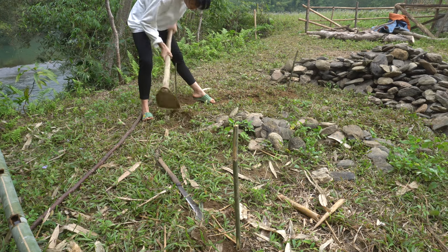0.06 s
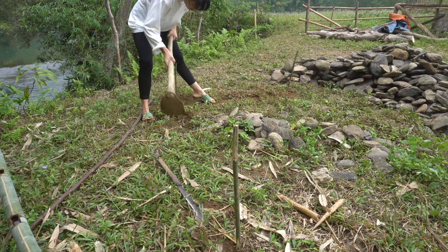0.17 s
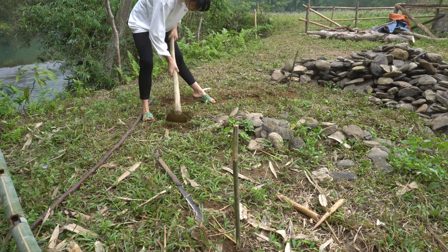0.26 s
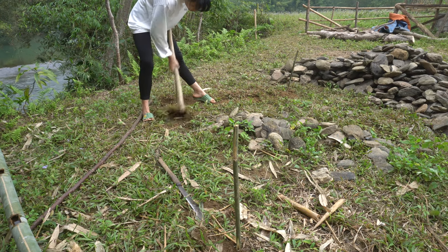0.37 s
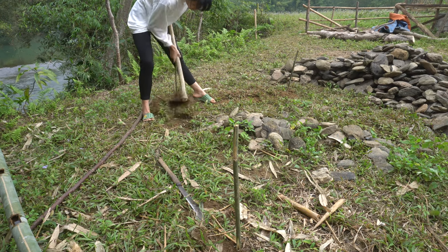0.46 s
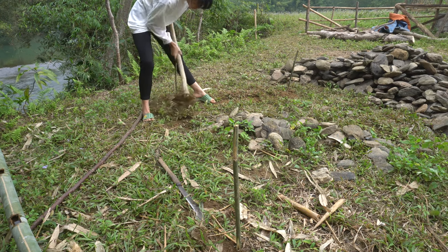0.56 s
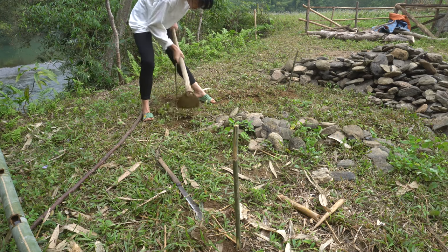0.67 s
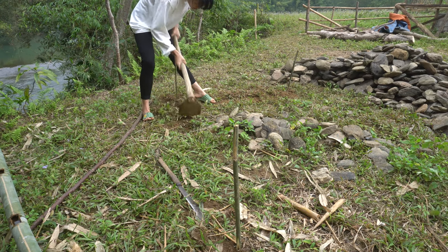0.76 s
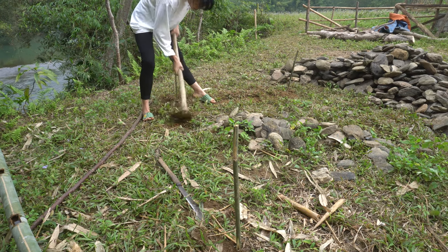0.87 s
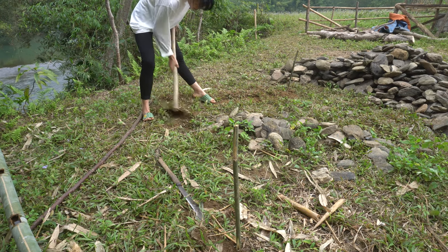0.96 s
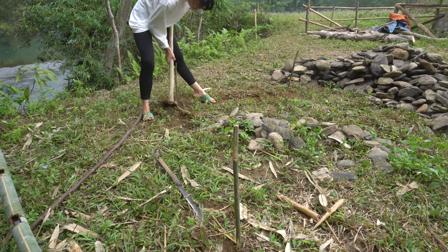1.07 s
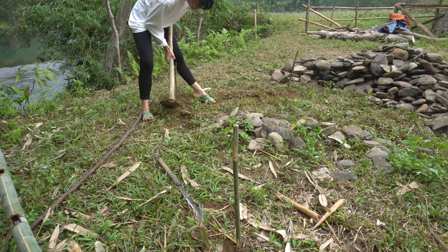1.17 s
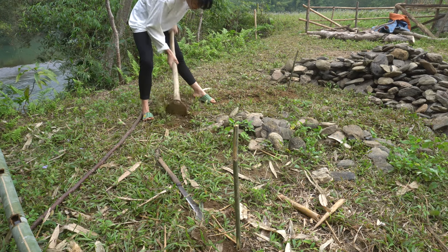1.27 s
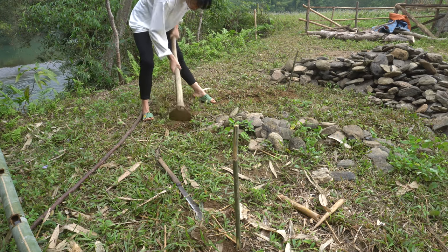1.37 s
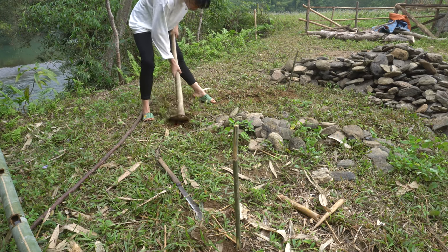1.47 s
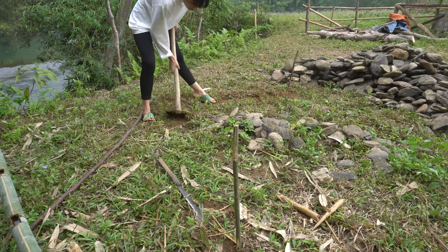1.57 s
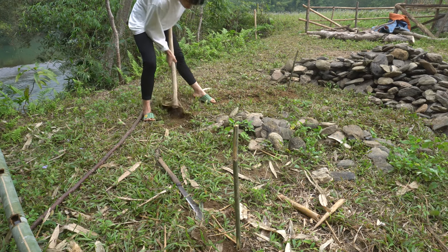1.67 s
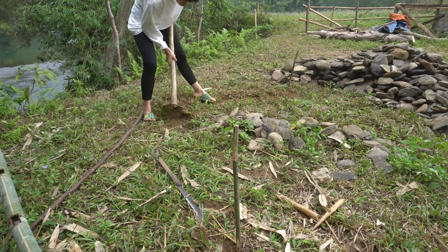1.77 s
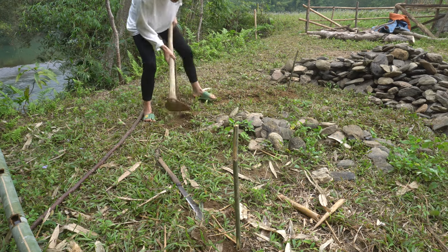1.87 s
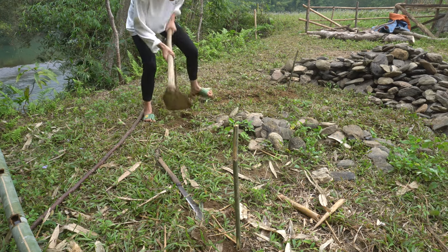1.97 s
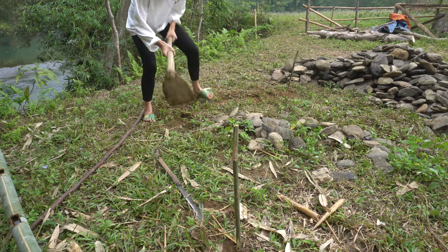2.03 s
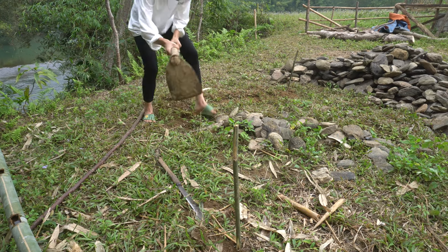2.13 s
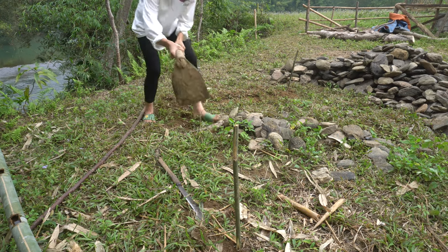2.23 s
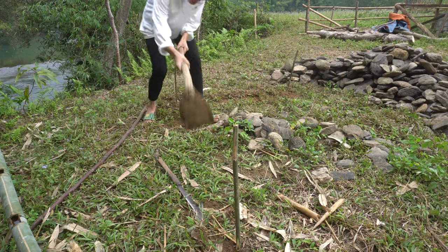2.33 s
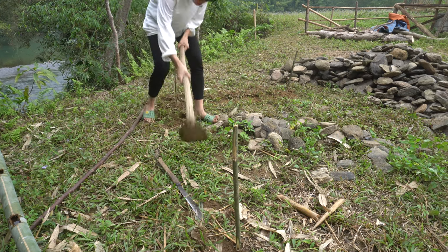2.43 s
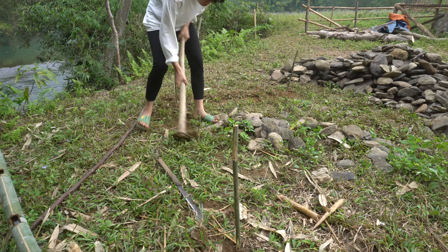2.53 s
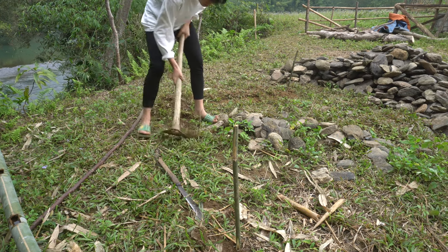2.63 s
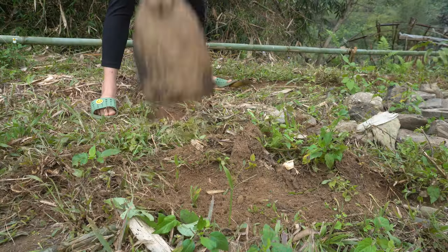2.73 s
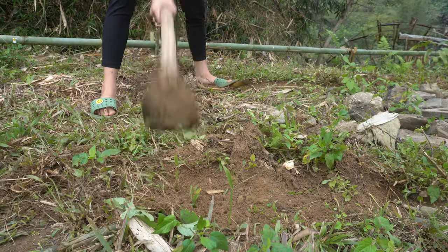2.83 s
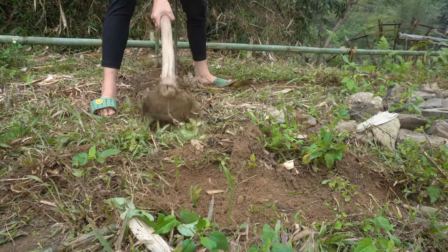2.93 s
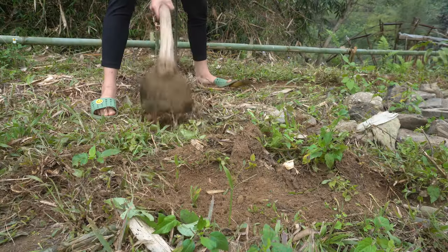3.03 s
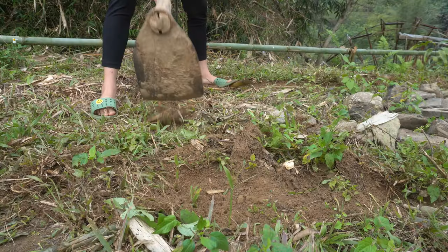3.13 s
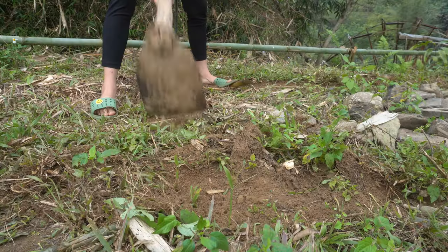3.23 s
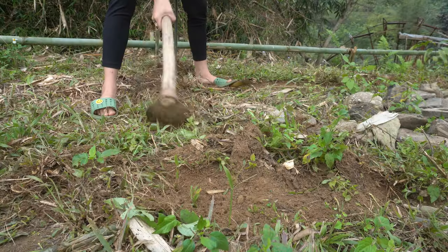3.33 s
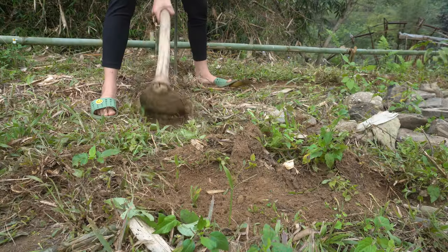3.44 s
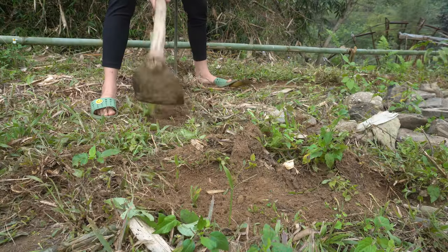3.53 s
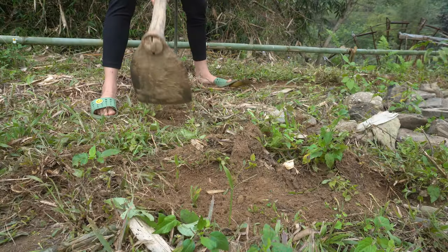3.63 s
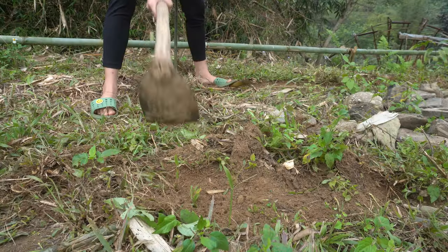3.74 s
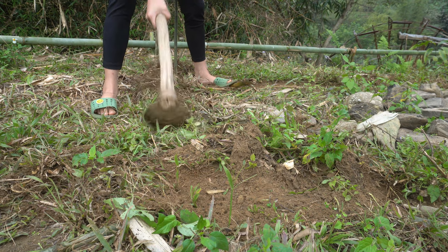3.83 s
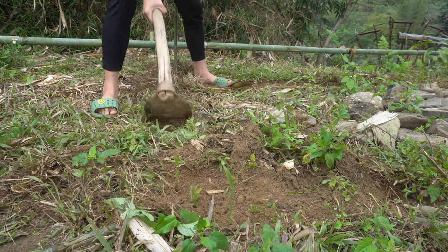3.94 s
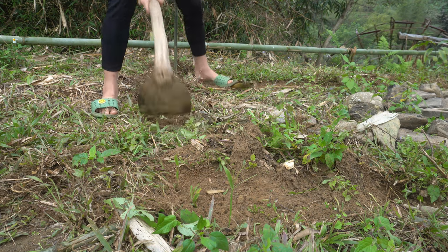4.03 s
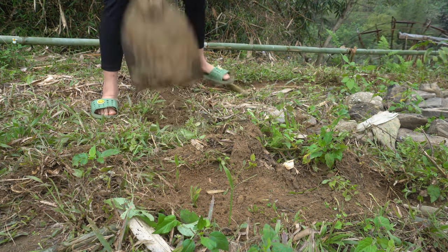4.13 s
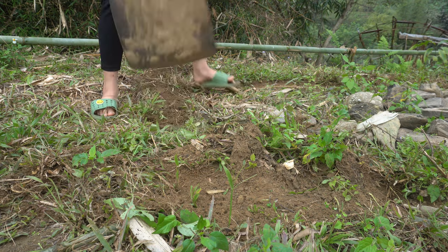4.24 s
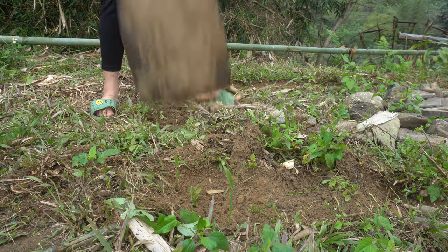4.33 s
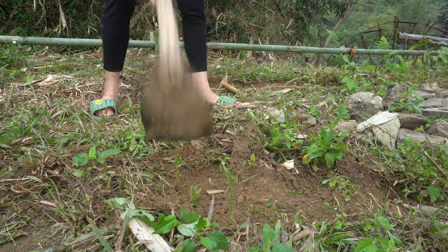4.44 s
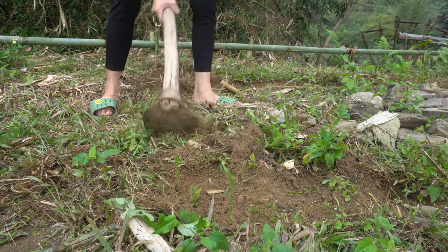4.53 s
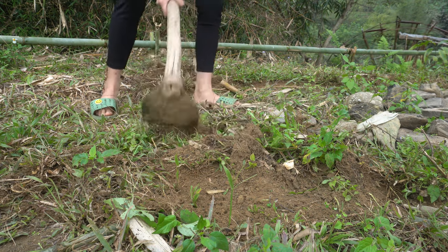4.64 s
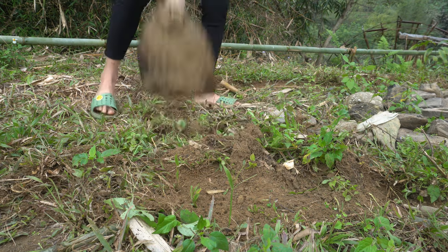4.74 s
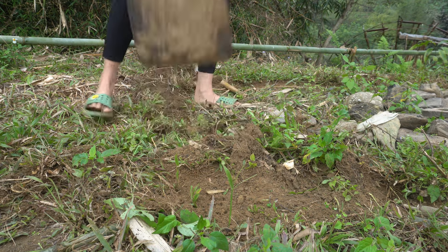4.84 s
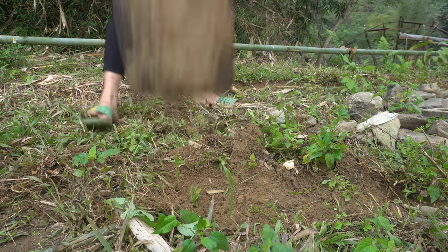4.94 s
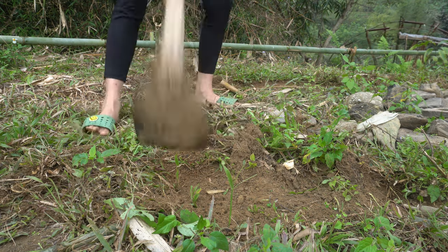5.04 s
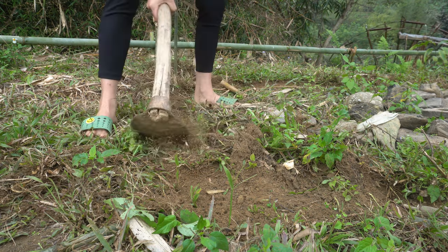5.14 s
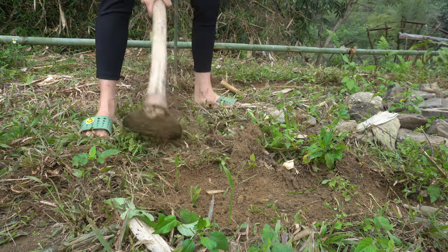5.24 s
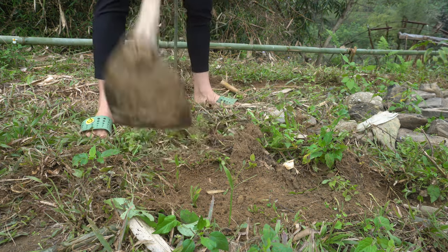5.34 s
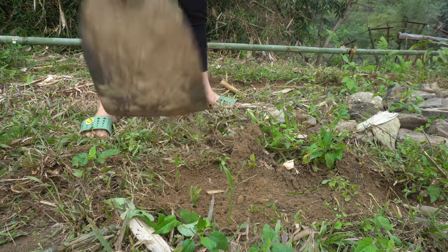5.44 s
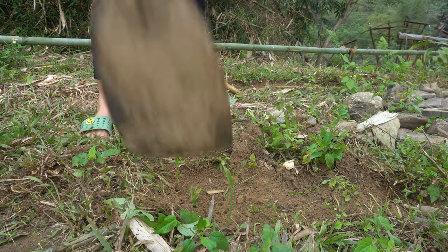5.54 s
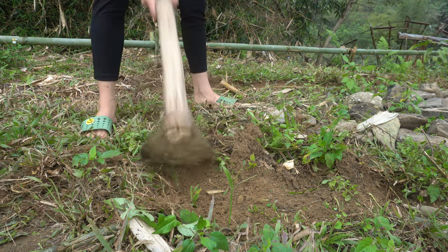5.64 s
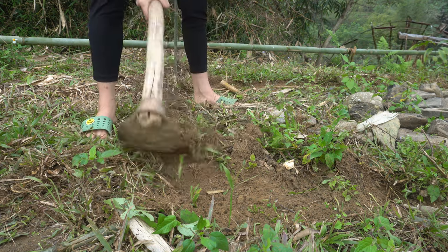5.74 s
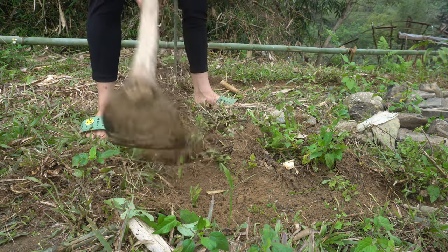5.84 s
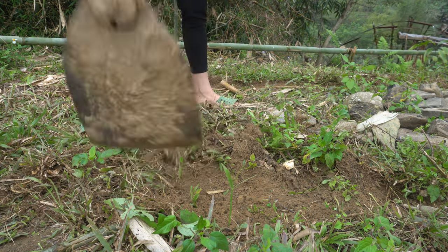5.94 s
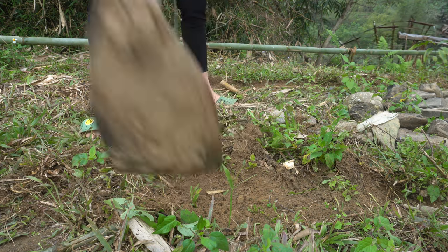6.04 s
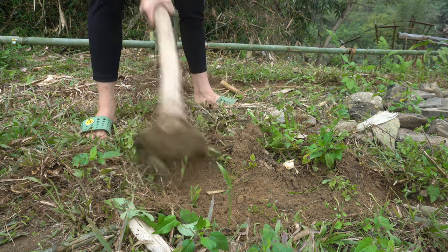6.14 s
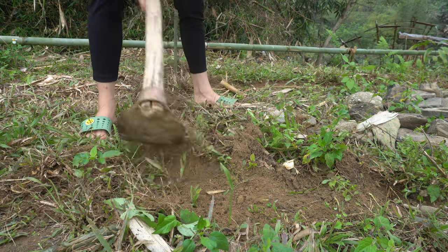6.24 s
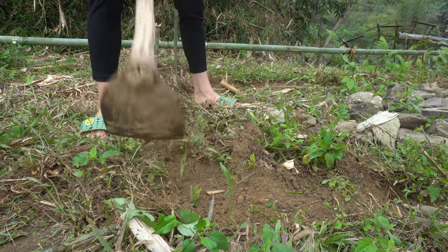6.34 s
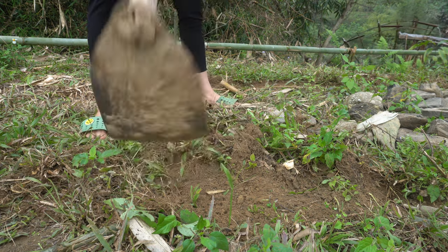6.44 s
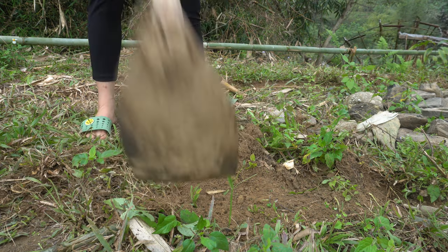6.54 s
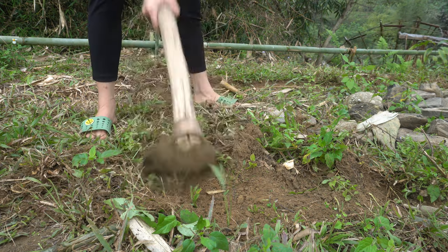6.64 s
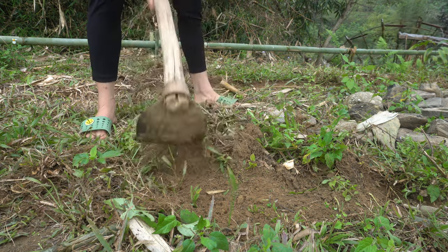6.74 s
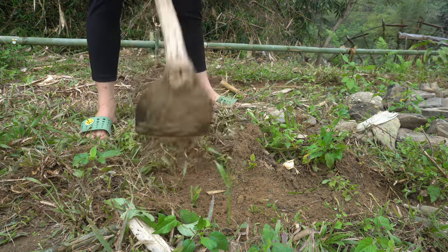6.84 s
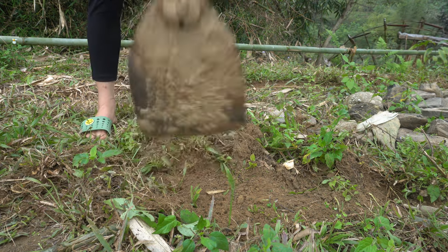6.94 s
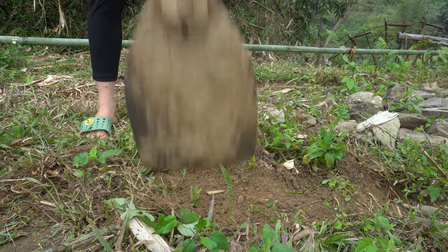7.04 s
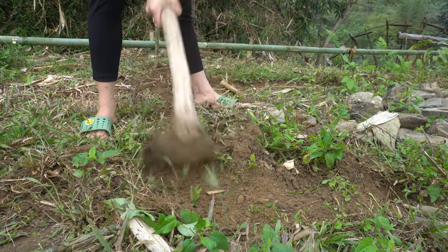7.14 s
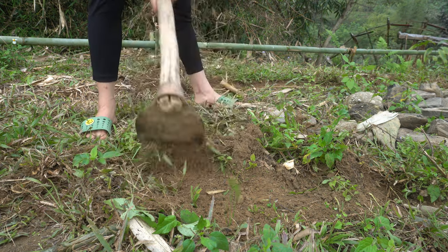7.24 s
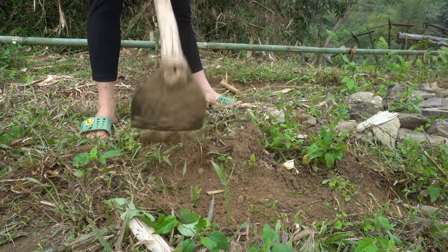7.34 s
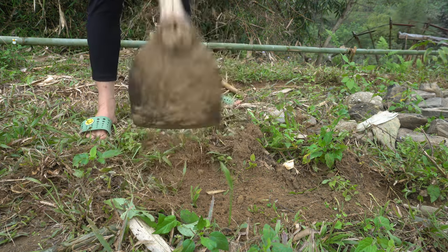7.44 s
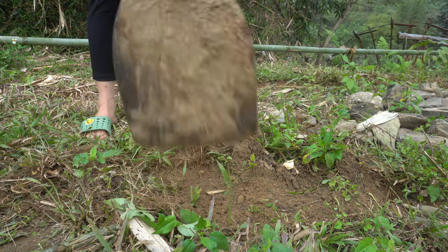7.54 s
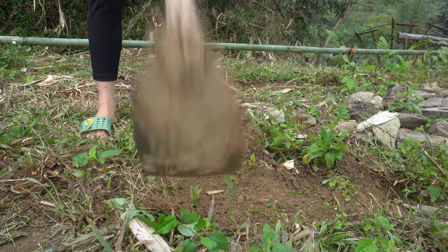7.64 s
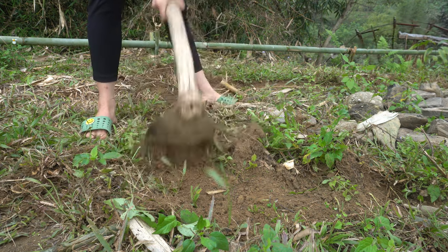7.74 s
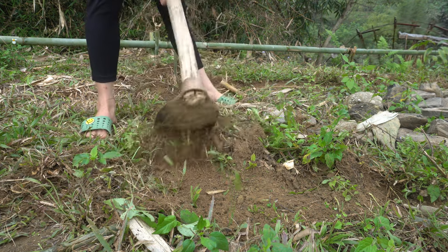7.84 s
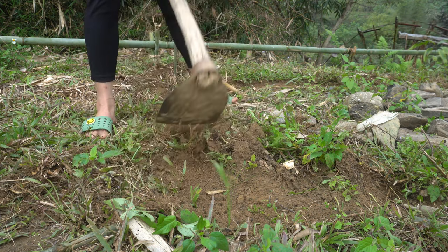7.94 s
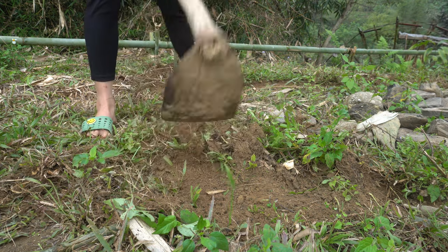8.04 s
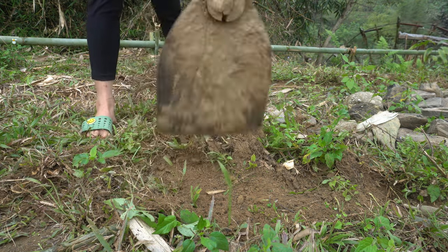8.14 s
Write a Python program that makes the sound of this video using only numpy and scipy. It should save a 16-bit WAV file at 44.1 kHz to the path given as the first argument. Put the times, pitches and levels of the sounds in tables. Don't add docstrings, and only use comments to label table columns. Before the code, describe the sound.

In open air, river and leaves hiss softly throughout. From 0 to 2.7 seconds the hoe is heard from further off: crunchy chops at about 0.35, 0.9, 1.5 and 2.5 seconds, each tearing roots with a small click and earth rustle. A distant one-cylinder engine putters with clattering valves, gradually slowing, loosely rattling around 1.6 to 2.2 and sinking to a hum. One loud hollow wooden knock with a short slap echo comes at 0.23. A tiny silence at 2.75 cuts to a close microphone. Strokes land near 2.9, 3.35, 3.87, 4.5, 5.1, 5.66, 6.15, 6.65, 7.16 and 7.7, growing heavier and sharper: gritty tearing, stone ticks, brief damped steel ringing, low soil thumps. Dirt patters on leaves and grass scuffs between them, especially around 4.3 and 8. A smoother machine drones faintly, mostly dying away by 3.7, with weak traces later.

```python
import sys
import numpy as np
from scipy import signal
from scipy.fft import rfft, irfft, next_fast_len
from scipy.io import wavfile

SR = 44100
rng = np.random.default_rng(int(sys.argv[2]) if len(sys.argv) > 2 else 0)


def dump_mix(stems):
    frames = np.atleast_2d(stems).T
    limited = np.clip(frames, -1, 1)
    pcm = np.round(limited * 32767).astype(np.int16)
    wavfile.write(sys.argv[1], SR, pcm)


def linear_from_db(decibels):
    return 10 ** (np.asarray(decibels, float) / 20)


N = 361619
TIME = np.arange(N) / SR

# pitch in Hz, level in dB, time to decay 60 dB in seconds.
BLADE = [(678, 0, .19), (938, -8, .05), (1320, -3, .08), (1615, -3, .07), (2062, -1, .13), (2310, -5, .06),
         (2770, -6, .05), (3020, -2, .15), (3585, -6, .05), (4300, -4, .06), (4600, -8, .04),
         (5815, -6, .08), (6060, -7, .06), (6790, -12, .04)]
# time in seconds, gain in dB.
SPLICE = [
    (2.72, 0),
    (2.736, -8),
    (2.743, -30),
    (2.746, -200),
    (2.7815, -200),
    (2.782, -5),
    (2.83, 0),
]
# frequency in Hz, left minus right in dB.
AIR_PAN = [(150, -0.5), (380, 0), (700, 2.5), (2400, 2.5), (15000, 7)]
FAR_END_S = SPLICE[3][0]


def unit(x):
    return x / np.sqrt(np.mean(x ** 2))


def on_log(hz, table):
    f, v = np.transpose(table)
    return np.interp(np.log(np.maximum(hz, 1)), np.log(f), v)


def band(x, lo_hz, hi_hz):
    return signal.sosfilt(signal.butter(2, [lo_hz, min(hi_hz, .49 * SR)], "band", fs=SR, output="sos"), x)


def colour(x, table):
    cepstrum = irfft(on_log(np.linspace(0, SR / 2, 4097), table) * np.log(10) / 20)
    cepstrum[1:4096] *= 2
    cepstrum[4097:] = 0
    impulse = irfft(np.exp(rfft(cepstrum)))
    return signal.fftconvolve(np.atleast_2d(x), impulse[None], axes=1)[:, :N]


def ring(x, hz, t60):
    r = 1000 ** (-1 / (t60 * SR))
    w = 2 * np.pi * hz / SR
    return signal.lfilter([0, r * np.sin(w)], [1, -2 * r * np.cos(w), r * r], x)


def walk(rate):
    levels = rng.standard_normal(int(TIME[-1] * 400))
    return np.interp(TIME * rate, np.arange(len(levels)), levels)


def grains(rate, spread_db):
    hit, size = rng.random((2, N))
    loudness = linear_from_db(spread_db * np.minimum(-np.log(size), 3))
    return unit((hit < rate / SR) * rng.standard_normal(N) * loudness)


def noise_bands(bands, gate=1):
    return sum(linear_from_db(db) * unit(band(gate * rng.standard_normal(N), hz - width / 2, hz + width / 2))
               for hz, width, db in bands)


def ports(x, other, like, pan, lag_s=9e-6):
    size = next_fast_len(N)
    hz = np.fft.rfftfreq(size, 1 / SR)
    shared = np.clip(on_log(hz, like), 0, 1)
    gain = linear_from_db(on_log(hz, pan) / 2)
    left = rfft(x, size)
    right = shared * left + np.sqrt(1 - shared * shared) * rfft(other, size)
    right = right * np.exp(-2j * np.pi * hz * lag_s)
    return np.array([irfft(left * gain, size), irfft(right / gain, size)])[:, :N]


def scatter(x):
    t = np.arange(int(0.0073 * SR)) / SR
    echo = rng.standard_normal(len(t)) * np.exp(-t / 0.00215)
    return signal.fftconvolve(x, echo / np.linalg.norm(echo))[:N]


def strokes():
    # start in seconds, length in seconds,
    # tearing on entry in dB, tearing on exit in dB.
    grazes = [(0.308, 0.0276, -45, -31.5), (0.889, .022, -52, -39), (1.475, 0.0505, -48, -34),
              (2.464, 0.0476, -51, -34.5), (2.844, 0.032, -36, -31), (3.314, 0.034, -50.5, -45),
              (3.824, 0.0304, -47, -34), (5.63, 0.018, -44, -50), (6.118, 0.031, -32.5, -40),
              (6.624, 0.0294, -38.5, -32), (7.107, .02, -44, -46), (7.128, .024, -36, -35.5),
              (7.69, 0.0185, -42, -33.5)]
    # the same four columns, then body in dB re tearing.
    cuts = [(.352, .017, -30, -31, -1), (0.914, 0.0402, -26.5, -34.5, -3), (0.969, 0.038, -32, -47, -6.5),
            (1.52, .016, -31, -30, -3), (1.537, .03, -36, -44, -3), (2.517, .032, -27.5, -31, -2),
            (2.878, .028, -25, -35, 1), (3.343, .024, -31, -25, -2), (3.368, .02, -33, -44, -4),
            (3.855, .022, -28, -32.5, -4), (3.878, .02, -35, -45, -4), (4.464, .036, -28, -18, -1.5),
            (4.497, 0.0433, -23.5, -40.5, 1.5), (5.067, .034, -23, -21, -3.5), (5.102, .022, -31, -41, -4),
            (5.6535, .025, -21, -24, -3), (5.68, .048, -30, -37, -10), (6.138, .011, -23, -24, -0.5),
            (6.15, .03, -33, -43, -8), (6.6435, .0145, -25, -22.5, 0), (6.667, 0.0817, -35, -49.5, -11),
            (7.1595, .01, -22, -21, 3), (7.174, 0.068, -33, -47, -14), (7.711, 0.021, -32, -36, -14),
            (7.729, 0.074, -38, -42, -6)]
    # frequency in Hz, level in dB.
    tear_tone = [(530, -34), (800, -22), (1100, -10), (2050, -9.5), (3280, -13), (4370, -15), (4750, -13),
                 (5680, -16.5), (7130, -14), (13300, -17), (15700, -19.5)]
    attack_db_per_s, release_db_per_s = 5500, 2200
    passes = [(*graze, -17.5, -11) for graze in grazes] + [(*cut, -7) for cut in cuts]
    power = np.zeros((3, N))
    for s, length, in_db, out_db, body_db, ring_db in passes:
        near = slice(int((s - .1) * SR), int((s + .3) * SR))
        t = TIME[near] - s
        db = np.interp(t, [0, length], [in_db, out_db])
        db += attack_db_per_s * np.minimum(t, 0) - release_db_per_s * np.maximum(t - length, 0)
        power[:, near] += linear_from_db(2 * np.array([[0], [body_db], [ring_db]])) * linear_from_db(2 * db)
    tear_gain, body_gain, ring_gain = np.sqrt(power)

    cracks = grains(7000, 1.86) * linear_from_db(2.6 * walk(130))
    tear = unit(colour(cracks, tear_tone)[0]) * tear_gain
    clods = grains(2500, 1.69) * linear_from_db(2.5 * walk(150))
    lowest_mode = unit(ring(clods, BLADE[0][0], .04))
    body = unit(unit(band(clods, 192, 760)) + linear_from_db(-6) * lowest_mode) * body_gain
    blade = sum(ring(linear_from_db(db + 3.1 * walk(18)) * cracks * ring_gain, hz, .025) for hz, db, _ in BLADE[2:])
    return tear + body + linear_from_db(-26) * blade


def thumps():
    # time in seconds, peak in dB, pitch in Hz, time to decay 60 dB in seconds.
    pushes = [(0.354, -30, 149.7, 0.065), (0.918, -49.5, 121, 0.057), (2.517, -40.5, 201, 0.074),
              (2.877, -34.5, 201, 0.032), (2.883, -33, 65, 0.058), (3.343, -26.5, 199.3, 0.035),
              (3.358, -22.5, 117.6, 0.047), (3.857, -27.5, 206.8, 0.051), (3.866, -33.5, 121.4, 0.065),
              (4.484, -17.5, 169.3, 0.023), (4.501, -31.5, 71, 0.041), (5.077, -20, 203.5, 0.058),
              (5.095, -28, 121.4, 0.049), (5.661, -20.5, 140.2, 0.093), (5.662, -31.5, 70, 0.068),
              (5.69, -37.5, 138, 0.044), (6.137, -19.5, 145, 0.01), (6.152, -23.5, 79.6, 0.03),
              (6.655, -15.5, 90, 0.0293), (6.677, -36, 90, 0.091), (7.146, -40.5, 196, 0.035),
              (7.1603, -12, 300, .022), (7.1635, -11.5, 90, 0.0167), (7.184, -31, 100, 0.04),
              (7.229, -35.5, 109, 0.071), (7.718, -28, 132, 0.073)]
    out = np.zeros(N)
    t = np.arange(int(.15 * SR)) / SR
    onset = 1 - np.exp(-t / 0.00384)
    bent_time = t + 0.0025 * (1 - np.exp(-t / 0.00256))
    for s, db, hz, t60 in pushes:
        swing = np.sin(2 * np.pi * hz * bent_time) * onset * 1000 ** (-t / t60)
        i = int(s * SR)
        out[i:i + len(t)] -= linear_from_db(db) * swing / np.abs(swing).max()
    return out


def ticks():
    # time in seconds, peak in dB, favoured pitch in Hz, ring in dB.
    stones = [(.3581, -16.5, 1610, -8.5), (0.9125, -22.5, 2800, -4.5), (0.97, -19, 1500, -6),
              (1.5209, -25, 1615, -5.5), (2.5197, -12, 3000, -16), (2.885, -13.5, 4520, -3.5),
              (3.3439, -16.5, 4300, -7), (3.366, -15.5, 5900, -8), (3.866, -15, 4300, -7.5),
              (3.8885, -24, 4300, -13), (4.463, -18.5, 1990, -11), (4.4895, -14, 3020, -14),
              (4.501, -11, 2350, -12), (4.548, -27, 678, -8), (5.0725, -13, 3020, -14),
              (5.081, -11, 5815, -11), (5.088, -13, 2310, -9), (5.096, -11, 5870, -8.5),
              (5.659, -9, 3030, -13.5), (5.6755, -13, 3585, -12), (5.675, -17, 678, -3),
              (5.6916, -19, 1627, -3.5), (5.698, -17.5, 678, -7), (6.141, -10, 2400, -12),
              (6.144, -11, 2062, -9.5), (6.6505, -14, 4300, -11), (6.655, -10, 3120, -13.5),
              (6.668, -25, 2062, -2), (6.673, -37, 3020, -.5), (7.1413, -22, 2930, -23.5),
              (7.1586, -8, 1400, -9), (7.163, -12, 5900, -11), (7.709, -4, 6300, -14),
              (7.7139, -7, 6300, -16), (7.7915, -18, 2500, -16)]
    # pitch in Hz, left minus right in dB.
    stone_pan = [(1500, 2), (2400, 1), (3000, 3.5), (6000, 4.5)]
    # time in seconds,
    # peak in dB, favoured pitch in Hz, ring in dB, left minus right in dB.
    taps = [(1.497, -24, 1590, -12.5, 8.5), (2.843, -32, 3020, -5.5, 0.5), (2.87, -20.5, 1580, -13.5, -0.5),
            (3.303, -34, 3010, -8, 2), (3.8124, -31.5, 4330, -10, 5), (4.9713, -32.5, 2810, -12, 16),
            (5.2886, -28, 5900, -24.5, 14), (5.63, -27, 2600, -2, 2.5), (5.7094, -25.5, 5820, -6, 17),
            (6.0483, -30.5, 1650, -23, -1), (6.1107, -30.5, 3050, -4, 1), (6.1185, -26, 3020, -6, 6.5),
            (6.6004, -29, 2970, -18, 4), (6.624, -34, 5000, -4, 9), (6.632, -23, 3020, -3, -1),
            (7.106, -31, 2050, -15.5, 0.5), (7.128, -27, 2950, -18, 2), (6.669, -28, 4600, -3, 5),
            (7.175, -25, 5900, -3, 6.5), (7.196, -32, 5900, .5, 6), (7.664, -28, 4000, -16, 2.5),
            (4.1099, -39, 9000, -30, 2),
        (4.1438, -37, 9000, -30, 2.5),
        (4.2929, -34, 11000, -30, 2.5),
        (4.528, -26, 6000, -22, 5),
        (4.8726, -35, 7000, -25, 12),
        (5.7215, -29, 2770, -8, 4),
        (7.359, -34, 3300, -21, 4.5),
        (7.6965, -28, 4300, -15, 6),
    ]
    rows = [(*stone, on_log(stone[2], stone_pan), 28) for stone in stones]
    rows += [(*tap, 15) for tap in taps]
    out = np.zeros((2, N))
    t = np.arange(int(.25 * SR)) / SR
    for s, db, hz, ring_db, pan_db, off_db in rows:
        burst = rng.standard_normal(len(t)) * np.exp(-t / .0012)
        crack = band(burst, max(hz / 2, 1000), min(4 * hz, 15000))
        free = linear_from_db(min(ring_db, 0) / 2)
        modes = 0
        for f, mode_db, t60 in BLADE:
            level = linear_from_db(mode_db - off_db * abs(np.log2(f / hz)))
            modes = modes + level * np.sin(2 * np.pi * f * t) * 1000 ** (-t / (t60 * free))
        i = int(s * SR)
        tick = linear_from_db(db) * (crack / np.abs(crack).max() + linear_from_db(ring_db) * modes)[:N - i]
        out[:, i:i + len(t)] += tick * linear_from_db(np.array([[pan_db], [-pan_db]]) / 2)
    return band(out, 300, 18000)


def rustle():
    # time in seconds, level in dB,
    # seconds to fade 20 dB, dull part in dB re level.
    showers = [(0, -51, .5, 4), (.39, -36.5, 0.2369, -10.5), (1.0, -47.5, 0.39, -2.5), (1.57, -47, .2, -3),
               (2.57, -44, 0.8148, -3), (2.93, -47.5, 2, -8), (3.4, -45.5, 0.42, -2.5),
               (3.93, -51.5, 1.3, -6), (4.569, -44.5, 0.31, -4), (5.12, -40, .5, -7), (5.76, -51, 1, -5),
               (6.2, -50.5, 0.94, -2.5), (6.74, -54, 0.78, -1), (7.25, -49, 0.04, -4), (7.76, -37, .2, -10)]
    # loudest moment in seconds, level in dB,
    # seconds to swell 20 dB, seconds to fade 20 dB, dull part in dB re level.
    scuffs = [(.7, -57, 1.38, 1.9, -5), (2.206, -43, .12, .16, -7), (4.02, -49, .06, .2, -9),
              (4.152, -45.5, .03, .16, -8), (4.24, -49, .05, .1, -9), (4.335, -40, .07, .12, -9),
              (4.375, -39.5, .1, .04, -5), (4.65, -49, .04, .06, -12), (4.78, -48, .06, .1, -8),
              (4.88, -45, .06, .3, -7), (5.265, -44.5, .2, .09, -9), (7.33, -52, .1, .2, -5),
              (8.0, -40, .3, .2, -7), (8.068, -41, .15, .03, -6)]
    shower_swell_s = 0.041
    swells = [(s, db, shower_swell_s, fade, dull_db) for s, db, fade, dull_db in showers] + scuffs
    power = np.zeros((2, N))
    for s, db, swell, fade, dull_db in swells:
        shape_db = 20 * np.minimum((TIME - s) / swell, (s - TIME) / fade)
        power += linear_from_db(2 * np.array([[db], [db + dull_db]])) * linear_from_db(2 * shape_db)
    bright_gain, dull_gain = np.sqrt(power)
    fine = np.array([grains(14000, .6) for _ in "lr"])

    def patter(lo_hz, hi_hz):
        return linear_from_db(1.2 * walk(35) + 1.8 * walk(11)) * unit(band(fine, lo_hz, hi_hz))

    bright = linear_from_db(-8.5) * patter(2900, 6000) - linear_from_db(-8.5) * patter(6000, 10000)
    bright = bright + linear_from_db(-3.5) * patter(10000, 19500)
    both = bright_gain * bright - dull_gain * patter(801, 2900)
    return ports(*both, [(800, .6), (4000, .78)], [(800, 1.5), (5000, 6.5)])


def engine():
    # time in seconds, hum in dB, exhaust in dB, clatter in dB.
    levels = [
        (0, -54, -52, -45),
        (.6, -52.5, -53, -46),
        (1.4, -50.5, -55, -48),
        (1.6, -50, -57, -65),
        (2.74, -48.5, -67.5, -83.5),
    ]
    # time in seconds, firings so far.
    firings = [
        (-.0205, 0),
        (.298, 7),
        (.664, 15),
        (.889, 20),
        (1.287, 29),
        (1.462, 33),
        (1.95, 43),
        (2.75, 58.3),
    ]
    # pitch in Hz, width in Hz, level in dB.
    exhaust = [(90, 15.6, -9), (277, 55, -2.5), (383, 27.5, -7.5)]
    # centre in Hz, width in Hz, level in dB.
    valves = [(1800, 700, -4), (3000, 600, 0), (3950, 600, -1), (5200, 700, -1), (6050, 600, 0),
              (9300, 3000, -1), (13000, 3000, -4)]
    s, *columns = np.transpose(levels)
    hum_db, beat_db, clack_db = (np.interp(TIME, s, column) for column in columns)
    cycle = np.interp(TIME, *np.transpose(firings))
    since = cycle % 1 / 22
    size = linear_from_db(1.2 * rng.standard_normal(int(cycle[-1]) + 1))[cycle.astype(int)]
    firing = size * (np.diff(cycle // 1, prepend=0) > 0)
    beat = sum(linear_from_db(db) * unit(ring(firing, hz, 2.56 / width)) for hz, width, db in exhaust)
    second_clack = .9 * (since > .008) * np.exp(-np.abs(since - .008) / .007)
    clack = noise_bands(valves, size * (np.exp(-since / .003) + second_clack))
    hum = np.sqrt(2) * linear_from_db(hum_db) * np.cos(4 * np.pi * cycle)
    return (hum + linear_from_db(beat_db) * unit(beat) + linear_from_db(clack_db) * unit(clack)) * (TIME < FAR_END_S)


def rattle():
    # time in seconds, rattles so far, level in dB.
    turning = [
        (1.55, 0, -62),
        (1.663, 3, -52),
        (1.7763, 6, -50),
        (1.8781, 9, -50),
        (2.0158, 13, -52),
        (2.153, 17, -60),
        (2.3, 21, -75),
    ]
    # centre in Hz, width in Hz, level in dB.
    metal = [(2800, 1200, .5), (5000, 900, -6), (7700, 1100, -6), (10500, 2500, -11)]
    s, turns, db = np.transpose(turning)
    cycle = np.interp(TIME, s, turns)
    size = linear_from_db(2 * rng.standard_normal(30))[cycle.astype(int)]
    gate = size * np.exp(-(cycle % 1) / .24) * (TIME > s[0])
    return 1.4 * linear_from_db(np.interp(TIME, s, db)) * gate * noise_bands(metal)


def machine():
    # time in seconds, drone in dB, whine in dB.
    levels = [
        (2.78, -53.5, -46),
        (3.1, -48, -47.5),
        (3.35, -55.5, -48.5),
        (3.7, -61.5, -63.5),
        (5, -60.5, -57),
        (6.5, -56.5, -61.5),
        (8.2, -64, -60),
    ]
    # centre in Hz, width in Hz, level in dB.
    whine_tone = [(1715, 450, -4.5), (2520, 604, -3), (3170, 465, -5), (5055, 1560, 0.5)]
    s, drone_db, whine_db = np.transpose(levels)
    drone = unit(band(rng.standard_normal(N), 357.7, 419.9)) * linear_from_db(np.interp(TIME, s, drone_db))
    whine = unit(noise_bands(whine_tone)) * linear_from_db(np.interp(TIME, s, whine_db))
    return (drone + whine) * (TIME > s[0])


def knock():
    # pitch in Hz, level in dB, time to decay 60 dB in seconds.
    hollow = [(250.8, -17, 0.6), (380.3, -5, 0.302), (461.7, 7, 0.166), (550, -2, 0.13), (668, -8.5, 0.201),
              (815, -20, 0.084), (961, -5.5, 0.202), (1280, -32, .05)]
    t = np.maximum(TIME - .2285, 0)
    push = (t > 0) * np.exp(-((t - .002) / 0.000294) ** 2)
    blow = band(band(push, 153, 924), 150, 950)
    slap = np.interp(t - .0075, t, push)
    modes = sum(linear_from_db(db) * ring(0.453 * push + slap, hz, t60) for hz, db, t60 in hollow)
    haze = unit(band(band(rng.standard_normal(N), 154, 1030), 154, 1030))
    echoes = (t > .008) * haze * np.exp(-t / 0.044)
    direct = .9 * blow / np.abs(blow).max() + linear_from_db(-1.5) * modes / np.abs(modes).max()
    return linear_from_db(-7) * (direct + linear_from_db(-21) * echoes)


def air():
    # frequency in Hz, level in dB.
    far_tone = [(15, -27), (25, -12), (123, -11), (210, -15.5), (254, -13), (351, -17.5), (435, -10.5),
                (512, -17), (670, -16), (3030, -20), (6630, -30.5), (15700, -34.5)]
    near_tone = [(15, -37), (30, -12), (53, 0), (75, -17.5), (99, -1.5), (333, -9), (380, -4), (472, -10.5),
                 (555, -8.5), (746, -15.5), (878, -15), (2650, -15.5), (15700, -26.5)]
    # frequency in Hz, left-right likeness from 0 to 1.
    air_like = [(60, 1), (290, 0.91), (640, 0.69), (1400, 0.4), (3100, 0.2), (7000, 0)]
    far_db, near_db = -44, -46.5
    swell = walk(2.057)
    white = 0
    for hz in 16 * 2. ** np.arange(11):
        flicker = linear_from_db(.5 * swell + 2.44 * walk(8.8))
        white = white + flicker * band(rng.standard_normal((2, N)), hz, 2 * hz)
    far = linear_from_db(far_db) * unit(colour(white, far_tone))
    near = linear_from_db(near_db) * unit(colour(white, near_tone))
    return ports(*np.where(TIME < FAR_END_S, far, near), air_like, AIR_PAN)


def scene():
    # frequency in Hz, left-right likeness from 0 to 1.
    hoe_like = [(150, .995), (400, .96), (1500, .92), (2600, .75), (4000, .3), (12000, .45)]
    # frequency in Hz, left minus right in dB.
    hoe_pan = [(300, 0.2), (1000, 1.5), (2400, .5), (4400, 8.5), (15000, 9)]
    knock_pan = [(110, 0), (380, -.5), (1300, -1.5)]
    hoe = strokes()
    motor = engine() + machine() + rattle()
    wood = knock()
    close = ports(hoe, scatter(hoe), hoe_like, hoe_pan) + thumps() + ticks() + rustle()
    far = ports(motor, scatter(motor), hoe_like, AIR_PAN)
    far = far + ports(wood, wood, hoe_like, knock_pan, lag_s=-.00008)
    return close + far + air()


def roll_off(x):
    return signal.sosfilt(signal.butter(12, 16980, fs=SR, output="sos"), x)


def record(dry):
    rounded = np.tanh(1.2 * dry) / 1.2
    top_cut = signal.ellip(10, .3, 60, 15820, fs=SR, output="sos")
    s, db = np.transpose(SPLICE)
    mix = signal.sosfilt(top_cut, rounded) * linear_from_db(np.interp(TIME, s, db))
    return roll_off(mix)


dry = scene()
out = record(dry)
dump_mix(out)
```